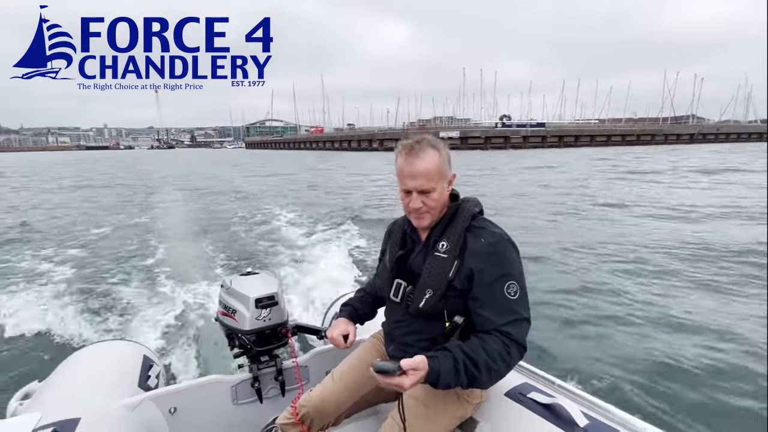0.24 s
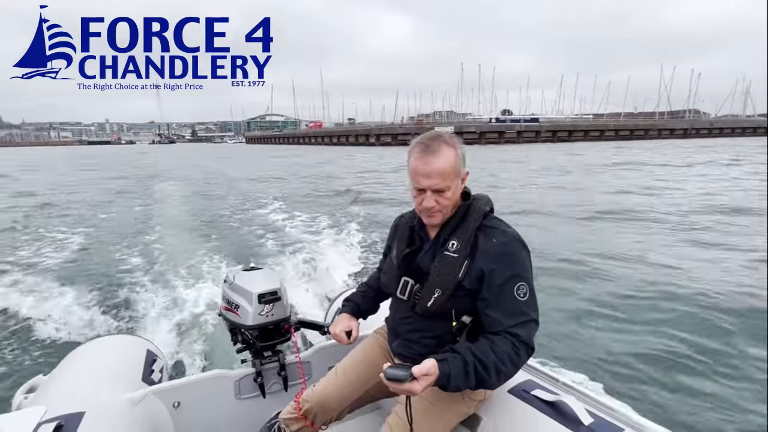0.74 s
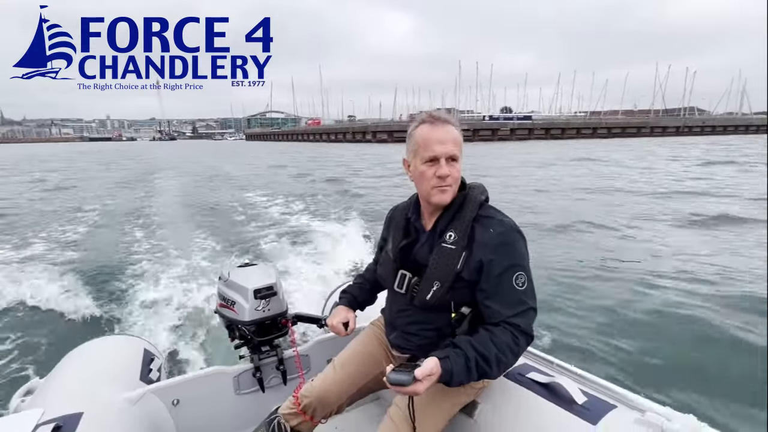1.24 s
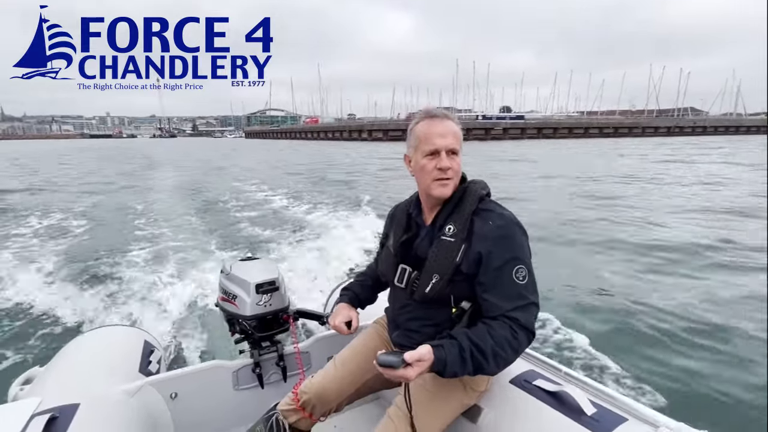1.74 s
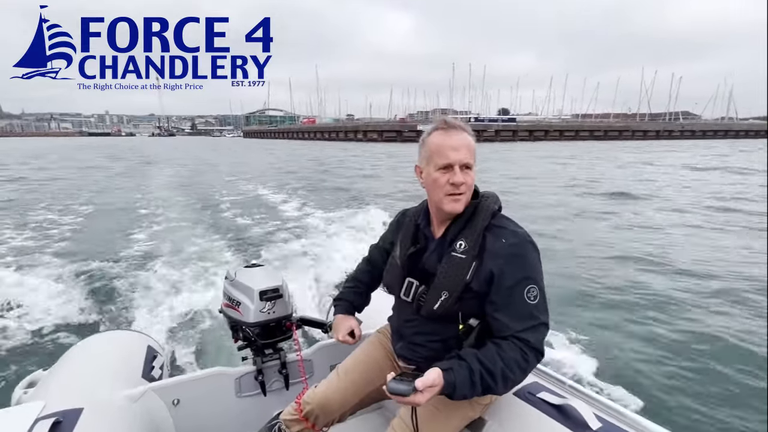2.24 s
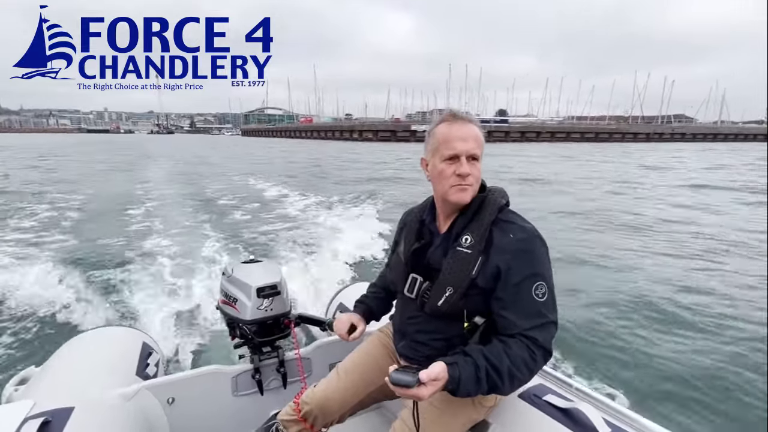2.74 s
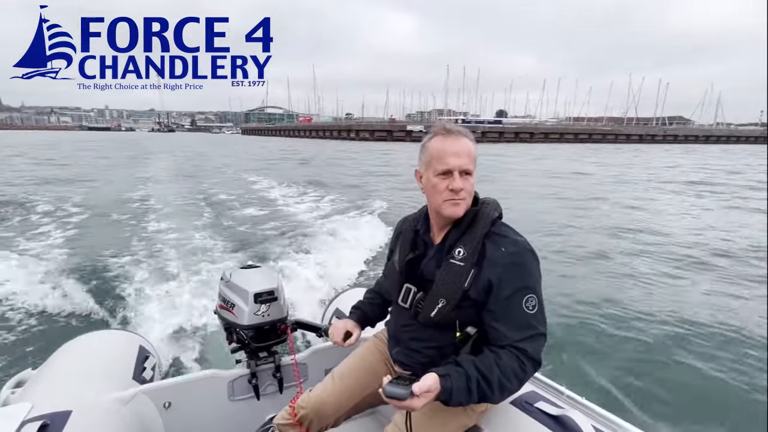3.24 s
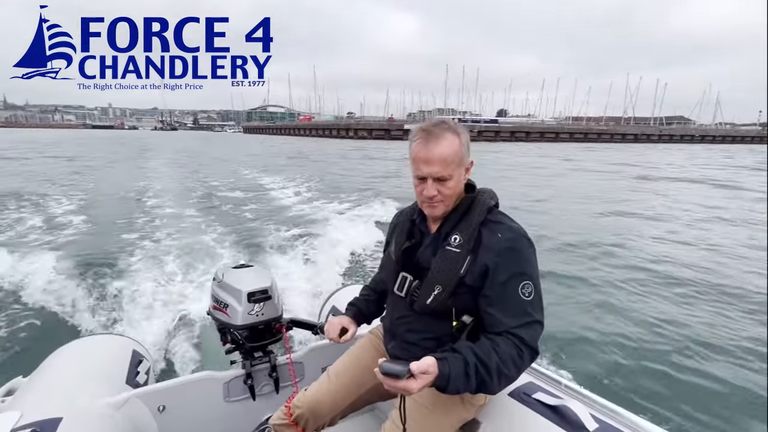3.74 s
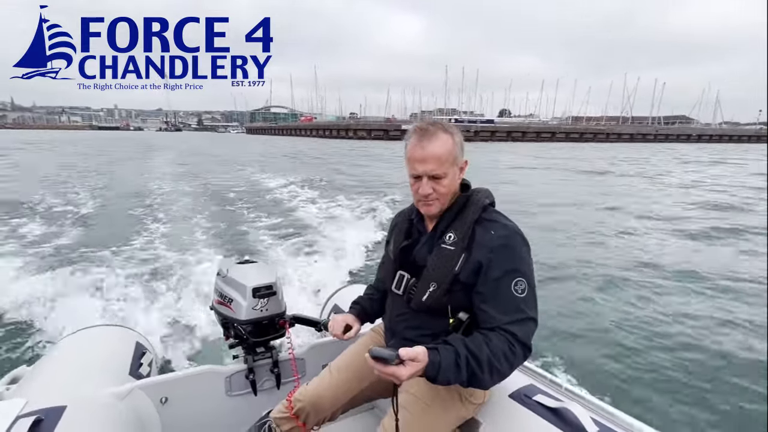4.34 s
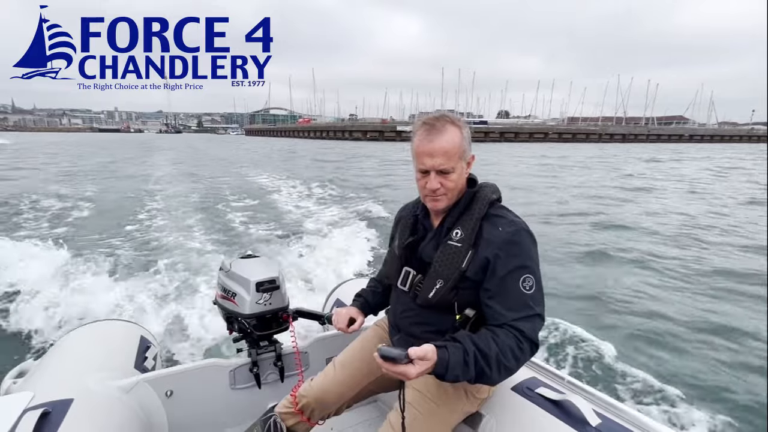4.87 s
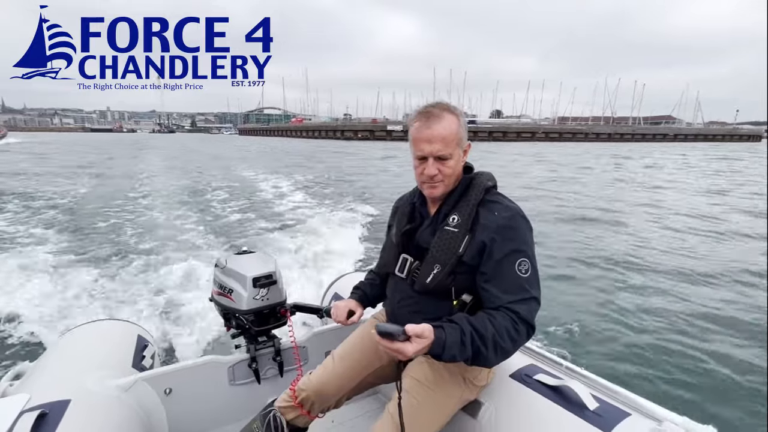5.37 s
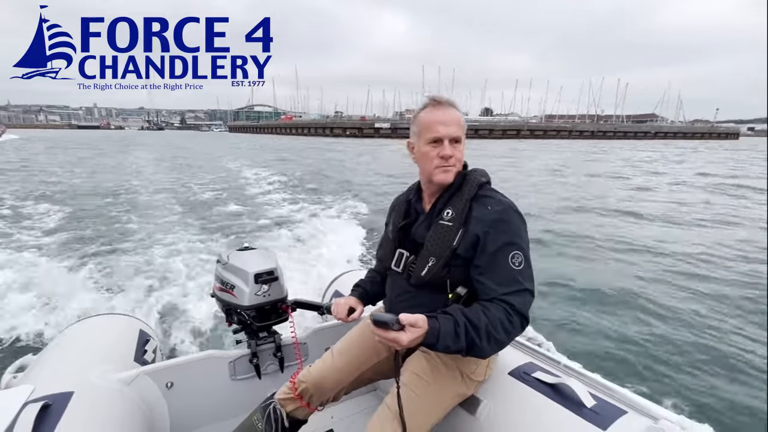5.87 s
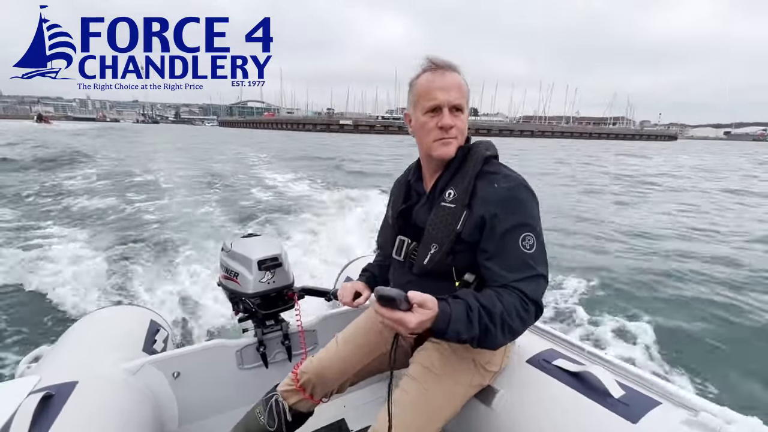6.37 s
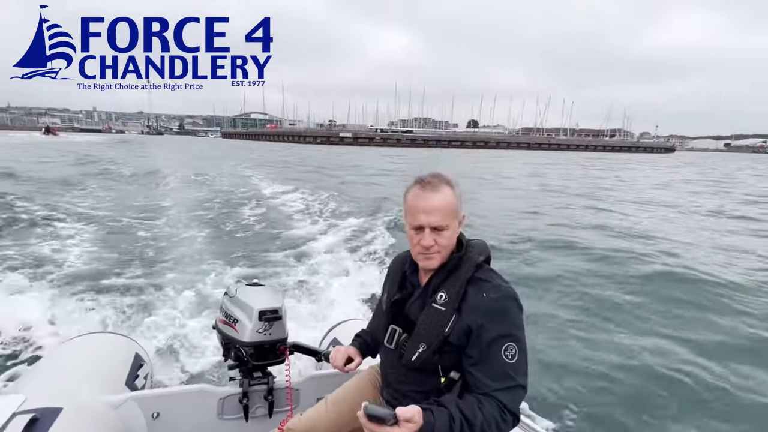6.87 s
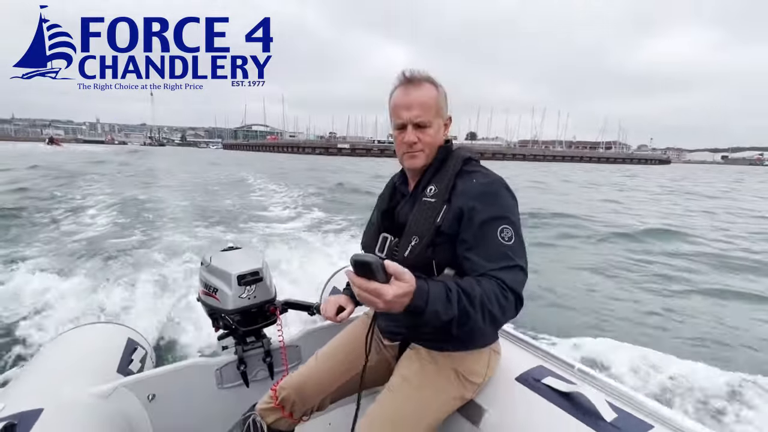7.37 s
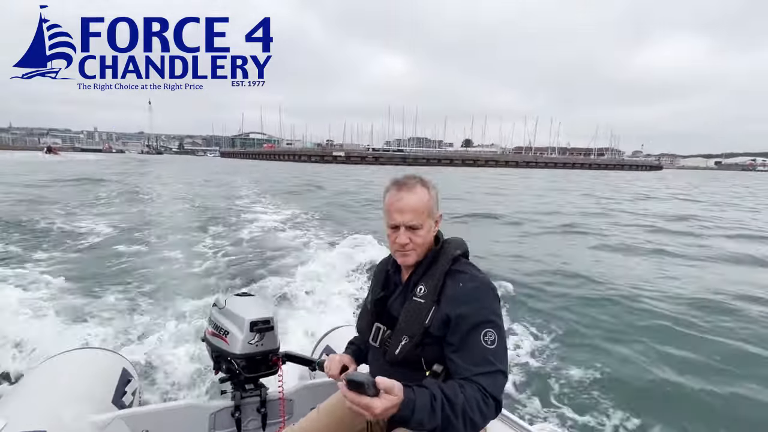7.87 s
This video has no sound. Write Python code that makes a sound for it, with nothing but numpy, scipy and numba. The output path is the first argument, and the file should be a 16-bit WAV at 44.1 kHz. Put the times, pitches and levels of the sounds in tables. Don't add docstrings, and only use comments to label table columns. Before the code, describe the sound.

A small petrol outboard drones at steady full throttle with a rough metallic clatter, while wake rushes and throbs behind an inflatable boat.

```python
import sys
import numpy as np
from scipy import signal
from scipy.io import wavfile
from numba import njit

SR = 44100
rng = np.random.default_rng(int(sys.argv[2]) if len(sys.argv) > 2 else 0)


def log_audio(samples):
    frames = np.atleast_2d(samples).T
    limited = np.clip(frames, -1, 1)
    pcm = np.round(limited * 32767).astype(np.int16)
    wavfile.write(sys.argv[1], SR, pcm)


def invert_db(x):
    u = np.asarray(x, float) / 20
    return 10 ** u


N = 357651


def level(x, rms_db):
    return x * invert_db(rms_db) / np.sqrt(np.mean(x ** 2))


@njit
def svf(x, hz, width_hz):
    y, band, low = np.empty(len(x)), 0., 0.
    g, k = np.tan(np.pi * hz / SR), width_hz / hz
    for i in range(len(x)):
        v = (band + g * (x[i] - low)) / (1 + g * (g + k))
        band, low, y[i] = 2 * v - band, low + 2 * g * v, k * v
    return y


def steep_band(x, hz, width_hz):
    hz, width_hz = float(hz), float(width_hz)
    return svf(svf(x, hz, width_hz), hz, width_hz)


def walk(rate_hz):
    knots = rng.standard_normal(1000)
    return np.interp(np.arange(N) * rate_hz / SR, np.arange(len(knots)), knots)


def ring(x, peaks, waver_db=0):
    out = 0
    for k, (hz, width_hz, db) in enumerate(peaks):
        gain = (-1) ** k * invert_db(db + waver_db * walk(1.506))
        out = out + gain * steep_band(x, hz, width_hz)
    return out


# start_s, cycle_rate_hz
REVS = [(0.0, 42.015), (0.65, 41.893), (1.22, 42.018), (1.61, 41.925), (2.26, 42.343), (3.11, 42.158),
        (3.31, 42.027), (3.59, 42.315), (4.05, 42.023), (4.87, 41.889), (5.1, 42.056), (5.68, 42.085),
        (6.0, 41.857), (6.59, 41.931), (6.9, 41.652), (7.21, 41.619), (7.45, 41.834), (8.11, 41.774)]


def engine_cycle(t_s):
    start_cycle = .139
    return start_cycle + np.cumsum(np.interp(t_s, *np.transpose(REVS))) / SR


# cycle_order, level_db
EXHAUST = [(1, -15), (2, 1), (3, -1.5), (4, -14.5), (5, -12), (6, -0.5), (7, -15.5), (8, -1), (9, -8.5),
           (10, -5.5), (11, -7), (12, -11.5), (13, -9.5), (14, -11.5), (15, -14), (16, -26), (17, -16.5),
           (18, -25.5), (19, -46.5), (20, -16)]
# cycle_order, level_db
HOWL = [(21, -12.5), (22, -18), (23, -11.5), (24, -17.5), (25, -10), (26, -18), (27, -14.5), (28, -25.5),
        (29, -57), (30, -19), (31, -19.5), (32, -32), (33, -60), (34, -30.5), (35, -27.5), (36, -27),
        (37, -27), (38, -35), (39, -28.5), (40, -26)]
STROKES = [(.09, .6), (.235, -.4), (.37, -.4), (.5, -.65), (.625, .8), (.71, .4), (.879, -1.1)]
GULPS = [(0.142, 0.48), (0.199, 1.23), (.64, 1.54), (0.931, 0.88)]


def gas(cycle, crank_db, transom_db, exhaust_db, howl_db):
    out = 0
    drag = 0.0022 * walk(30)
    for k, db in EXHAUST + HOWL:
        intake = k >= 21
        share, push = np.transpose(GULPS if intake else STROKES)
        lag_rad = np.angle(np.sum(push * np.exp(-2j * np.pi * k * share)))
        if intake:
            swell_db = howl_db
        elif k > 4:
            swell_db = exhaust_db
        else:
            swell_db = {2: crank_db, 4: transom_db}.get(k, 0)
        rough = 0.067 + 0.0077 * k
        size = invert_db(-26.5 + db + swell_db) * (1 + rough * walk(14))
        phase_rad = 2 * np.pi * k * (cycle + drag) + lag_rad + rough * walk(18)
        out = out + np.sqrt(2) * size * np.cos(phase_rad)
    return out


# cycle_share, level_db
TAPS = [(0.022, -4), (.25, -1), (0.472, 1), (0.572, -6), (.81, 0.5), (.93, -5.5)]


def taps(cycle):
    jitter_cycles, scatter_db, shake_s = 0.0019, -1.0, 0.00078
    clicks = np.zeros(N + 1)
    turns = np.arange(int(cycle[-1]) + 1)
    for share, db in TAPS:
        chance = rng.standard_normal((len(turns), 2)).T
        at = np.interp(turns + share + jitter_cycles * chance[0], cycle, np.arange(N))
        size, i = invert_db(db + scatter_db * chance[1]), at.astype(int)
        np.add.at(clicks, i, size * (1 - at + i))
        np.add.at(clicks, i + 1, size * (at - i))
    clicks = clicks[:N]
    shake = 0.28 + signal.lfilter([1], [1, -np.exp(-1 / (shake_s * SR))], clicks)
    return clicks, shake


def clatter(cycle, size=1024):
    at = (cycle + 0.00039 * walk(25)) % 1 * size
    tracks = np.array([np.interp(at, np.arange(size), rng.standard_normal(size), period=size)
                       for _ in range(3)])
    shares = np.array([invert_db(6.6 * walk(1.61)) for _ in tracks])
    return np.sum(shares * tracks, axis=0) / np.linalg.norm(shares, axis=0)


# centre_hz, width_hz, level_db
COWL = [(1809, 57, 2), (2007, 110, -0.5), (2094, 113, -10), (2207, 154, 1.5)]
COVER = [(2585, 160, -8), (2792, 224, 0), (2956, 78, 1.5), (3082, 160, -1), (3577, 520, -3.5)]
BLOCK = [(3386, 110, 3.5), (3670, 500, 8), (4200, 590, -2.5), (4785, 380, -2), (5300, 380, -3)]
FLYWHEEL = [(5670, 300, 0), (6260, 270, -6.5), (6650, 300, -2.5), (6960, 200, -3.5), (7700, 730, -11.5)]
# cycle_order, level_re_cover_db
WHINE = [(67, -12), (73, -10.5)]


def metal(cycle, cowl_db, cover_db, block_db, flywheel_db):
    clicks, shake = taps(cycle)
    rattle = shake * rng.standard_normal(N)
    drive = level(clicks, -13.5) + level(shake * clatter(cycle), 0) + level(rattle, -4.0)
    cowl, cover, block, flywheel = (level(ring(drive, peaks, waver_db=2.0), -2.1)
                                    for peaks in (COWL, COVER, BLOCK, FLYWHEEL))
    for k, db in WHINE:
        cover = cover + invert_db(db + 3.3 * walk(23)) * np.cos(2 * np.pi * k * cycle + 0.9 * walk(20))
    return (cowl * invert_db(cowl_db) + cover * invert_db(cover_db)
            + block * invert_db(block_db) + flywheel * invert_db(flywheel_db))


# centre_hz, width_hz, level_db
HEAD = [(3000, 730, -1.5), (4140, 390, -0.42)]


def knock(cycle, knock_db):
    burn_share, jitter_cycles, scatter_db = .84, .002, 1.5
    turns = np.arange(int(cycle[-1]))
    chance = rng.standard_normal((len(turns), 2)).T
    at = np.interp(turns + burn_share + jitter_cycles * chance[0], cycle, np.arange(N))
    raps = np.zeros(N)
    raps[at.astype(int)] = invert_db(scatter_db * chance[1])
    return invert_db(knock_db) * level(ring(raps, HEAD), 0)


# shaft_order, cycle_order, level_db
PROP = [(1, 0, -53), (1, 1, -50), (3, 0, -42), (6, 0, -51), (2, 1, -50), (3, 1, -46), (2, 2, -49)]


def propeller(cycle):
    gear_ratio, start_turns, kick_share, slip_rad = 28 / 13, .422, .358, .25
    shaft = start_turns + 2 * cycle / gear_ratio
    out = 0
    for k, m, db in PROP:
        size = np.sqrt(2) * invert_db(db + 0.71 * walk(2.4))
        phase_rad = 2 * np.pi * (k * shaft + m * (cycle - kick_share)) + slip_rad * walk(3)
        out = out + size * np.cos(phase_rad)
    return out


# freq_hz, density_db_per_hz
WAKE = [(20, -68), (60, -74.5), (105, -58.5), (190, -66), (250, -62.5), (400, -65.5), (1100, -66),
        (1400, -76.5), (2350, -86), (4400, -89), (8500, -103), (10300, -101), (12500, -106), (15500, -114)]


def wake(cycle, shade_db):
    out, (freq_hz, density_db) = 0, np.transpose(WAKE)
    spray_db = shade_db + 1.7 * np.cos(2 * np.pi * (cycle - .85))
    for hz in 22 * 2 ** np.arange(0, 9.6, 1 / 5):
        width_hz = hz / 4 * (1 + (hz / 14000) ** 2)
        band = steep_band(rng.standard_normal(N), hz, width_hz)
        flicker_db = (1.8 * walk(11) + 1.5 * walk(1.26)) / (1 + hz / 6000)
        band_db = np.interp(np.log(hz), np.log(freq_hz), density_db)
        out = out + invert_db(band_db + flicker_db + min(hz / 5000, 1) * spray_db) * band
    return level(out, -32)


def wind():
    gust_db = 2.5 * walk(9.4)
    rumble = ring(rng.standard_normal(N), [(42, 45, 0)])
    return level(invert_db(gust_db) * rumble, -47)


# start_s, level_db, pitch_hz, t60_s
SLAPS = [
    (2.18, -24, 60, .15),
    (2.752, -24.5, 1900, .06),
    (3.03, -28, 60, .12),
    (5.383, -28, 1200, .03),
]


def slaps():
    out, t_s, attack_s = 0, np.arange(N) / SR, 0.0042
    for start_s, db, hz, t60_s in SLAPS:
        age_s = np.clip(t_s - start_s, 0, None)
        burst = (1 - np.exp(-age_s / attack_s)) * np.exp(-np.log(1000) * age_s / t60_s)
        out = out + burst * level(steep_band(rng.standard_normal(N), hz, .9 * hz), db)
    return out


# start_s, engine_top_view (0-1), stern_lean (0-1), hull_trim (-1.25..1)
HELM = [(0, 1, 0.33, -0.19), (.82, 1, 0.27, 0.39), (1.0, 0, 0.4, 0.82), (1.7, 0, 0.33, 0.26),
        (2.2, 0, 0.3, 0.68), (3.35, 0.13, 0.4, 0.29), (3.55, 0.8, .4, -0.54), (4.0, 0.8, 0.53, -0.17),
        (5.4, 0.75, 0.14, -0.81), (5.6, .15, 0.33, -0.57), (6.1, 0.18, 0.83, 0.068),
        (6.7, 0.16, 0.75, 0.86), (7.0, .6, 0.8, 0.3), (7.3, 0.35, 0.63, -1.25), (7.78, 0.54, 0.96, 0.24),
        (8.11, 0.94, 0.85, 0.1)]
FOLLOW = {"crank": (0.5, 0.5, -1, 1.5), "transom": (-3, -0.5, 7.5, -2), "exhaust": (-1.9, -0.11, 1.1, -1.2),
          "howl": (-2.1, 1.46, 2.1, 0.64), "cowl": (-46.5, -7.5, 9, -2.5), "cover": (-47.5, 5, 4.5, -2.5),
          "block": (-46, 2.5, 0, 1), "flywheel": (-60, 8, 0, -1.5), "knock": (-57, -3.5, 7.5, -0.5)}


def scene():
    t_s = np.arange(N) / SR
    helm_s, *columns = np.transpose(HELM)
    view, lean, trim = (np.interp(t_s, helm_s, c) for c in columns)
    parts_db = [db + a * view + b * lean + c * trim for db, a, b, c in FOLLOW.values()]
    cycle = engine_cycle(t_s)
    engine = gas(cycle, *parts_db[:4]) + metal(cycle, *parts_db[4:-1]) + knock(cycle, parts_db[-1])
    water = propeller(cycle) + wake(cycle, 1.3 * view) + slaps()
    return (engine + water + wind())[None]


def band_limit(x):
    return signal.sosfilt(signal.butter(12, 15660, fs=SR, output="sos"), x)


def record(dry):
    change_s, slip_s, fade_s = 5.998, .0092, .003
    after = np.clip((np.arange(N) / SR - change_s) / fade_s + .5, 0, 1)
    mix = (1 - after) * dry + after * np.roll(dry, int(slip_s * SR), axis=1)
    return band_limit(mix)


dry = scene()
out = record(dry)
log_audio(out)
```